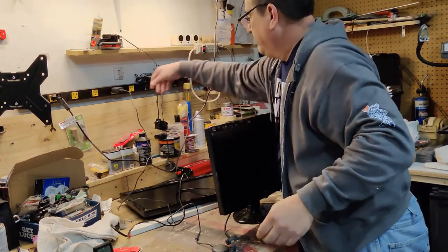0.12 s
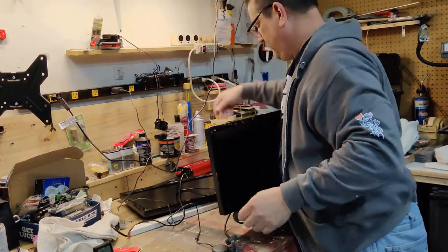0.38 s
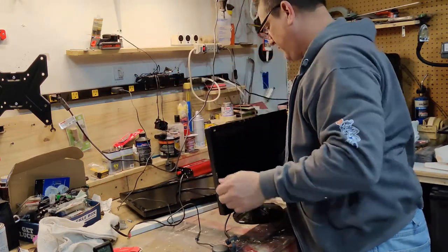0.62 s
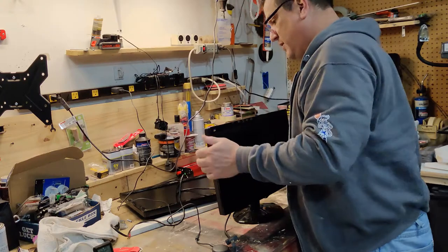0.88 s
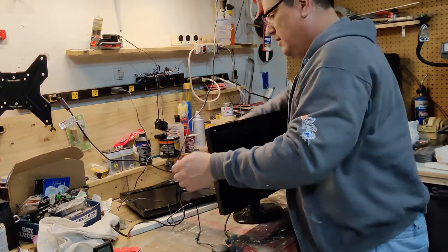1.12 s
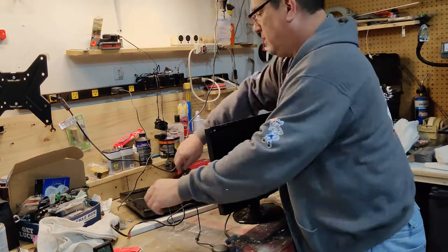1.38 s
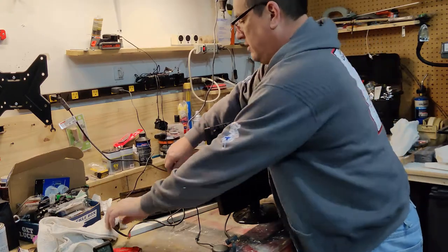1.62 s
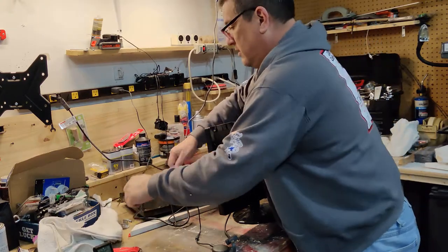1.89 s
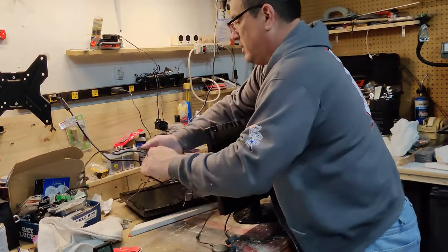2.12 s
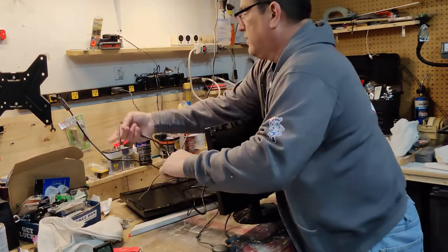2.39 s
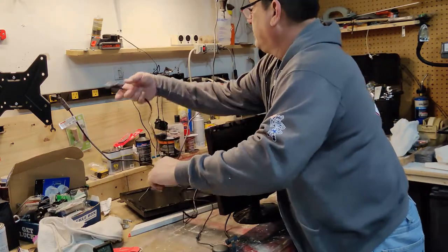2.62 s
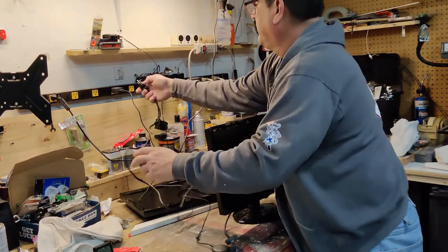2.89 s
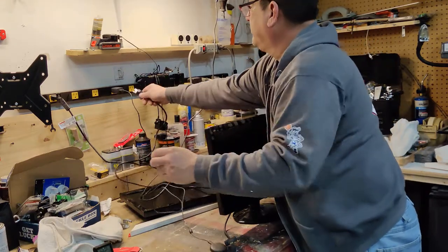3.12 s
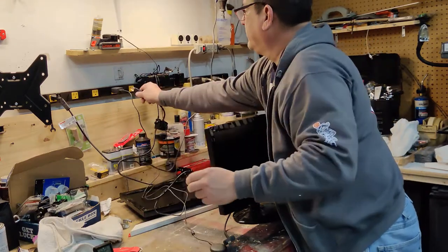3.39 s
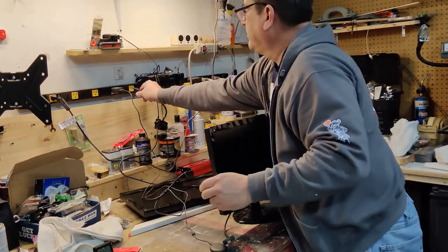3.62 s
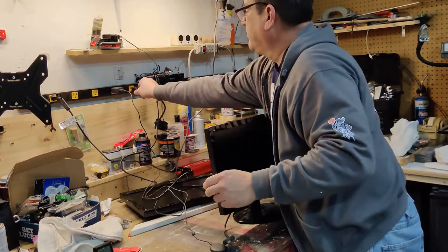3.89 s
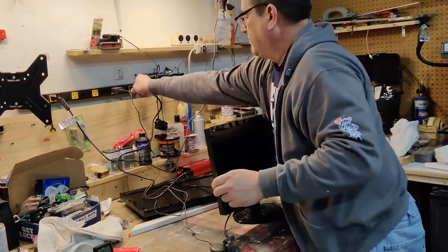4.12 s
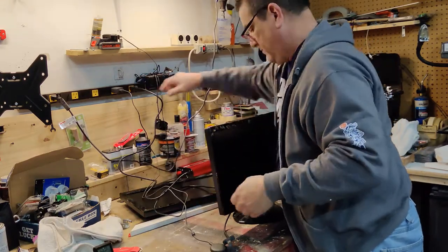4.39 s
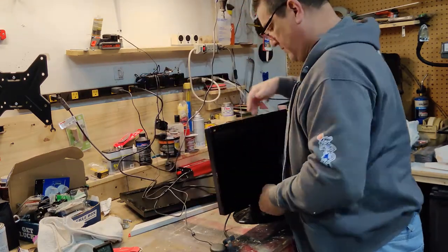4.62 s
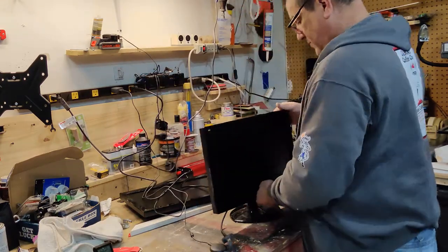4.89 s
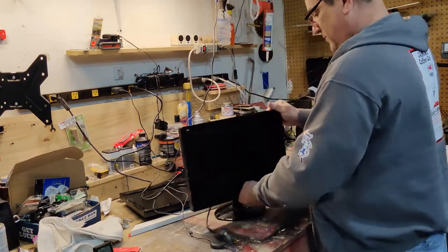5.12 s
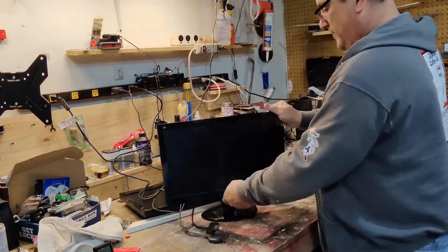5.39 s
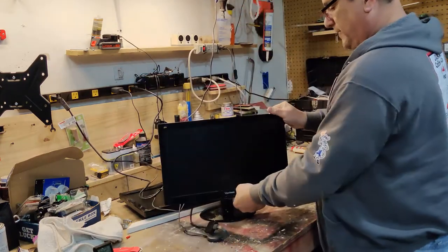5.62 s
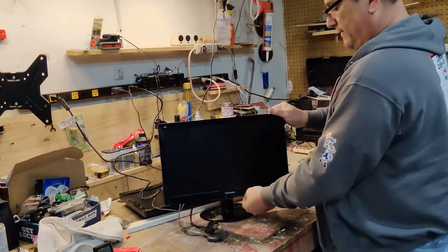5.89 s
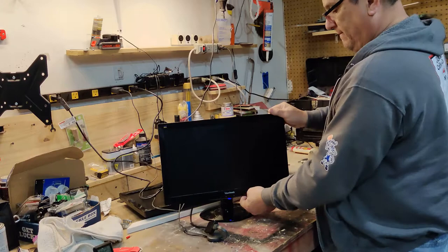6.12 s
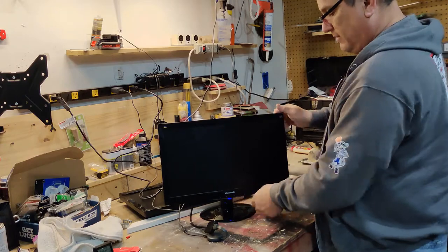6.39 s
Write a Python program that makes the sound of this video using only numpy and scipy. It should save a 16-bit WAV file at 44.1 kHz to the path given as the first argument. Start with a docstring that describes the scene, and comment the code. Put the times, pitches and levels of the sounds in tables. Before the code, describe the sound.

A low machine hum fills a garage. Faint rubbing leads to a quick clatter of plugs and cables on wood, followed by separated hard plastic knocks and light rustles as a plug is pushed in. Next come a rough slide, a low bench wobble and the loudest event, a bouncing hollow thunk of a monitor's foot. Small taps trail off. Two small microphones nearby catch dry detail and short reverberation.

```python
"""Knocks, scrapes and rustles come first: hands shift cables and push a plug into a strip on a wooden bench.
Then a monitor slides and its foot lands; behind it all a machine hums in the garage's low resonances.
Knocks are bursts of noise ringing parts and bench; rubbing is uneven noise that hisses, rustles and grinds.
The foot is a set of struck modes, the sway a low tone with rattle, the room shaped noise and wavering tones.
Two small microphones, each with its own treble peak, pick it all up."""
import sys
import numpy as np
from scipy import signal
from scipy.fft import rfft, irfft, next_fast_len
from scipy.io import wavfile
from scipy.ndimage import uniform_filter1d

SR = 44100
rng = np.random.default_rng(int(sys.argv[2]) if len(sys.argv) > 2 else 0)


def bounce(signal):
    """Save signal as a 16-bit WAV file at the path given by the first command-line argument."""
    frames = np.transpose(np.atleast_2d(signal))
    limited = np.clip(frames, -1, 1)
    pcm = np.round(limited * 32767).astype(np.int16)
    wavfile.write(sys.argv[1], SR, pcm)


def field_ratio(decibels):
    """Amplitude ratio for a level in dB (20 dB per decade); scalars and array-likes work."""
    return 10 ** (np.asarray(decibels, dtype=float) / 20)


N = 286650  # samples, 6.5 s


def evened(x):
    """Scales to rms 1."""
    return x / np.sqrt(np.mean(x ** 2) + 1e-20)


def read(points, hz):
    """Reads a table on a log-frequency axis."""
    f, value = np.transpose(points)
    return np.interp(np.log(hz + 1), np.log(f + 1), value)


def coloured(x, points):
    """Shapes the spectrum of x by (Hz, dB) points."""
    size = next_fast_len(x.shape[-1])
    gain = field_ratio(read(points, np.fft.rfftfreq(size, 1 / SR)))
    return irfft(rfft(x, size) * gain, size)[..., :x.shape[-1]]


def resonate(x, hz, width):
    """A resonance of peak gain 1."""
    return signal.lfilter(*signal.iirpeak(hz, hz / width, SR), x)


def steep_resonance(x, hz, width):
    """Two resonances in a row, the second twice as wide, brought to rms 1."""
    return evened(resonate(resonate(x, hz, width), hz, 2 * width))


def add(mix, s, sound):
    """Mixes a sound in at a time in seconds."""
    part = mix[round(s * SR):][:len(sound)]
    part += sound[:len(part)]


def envelope(start, length, rise_s, fade_db_per_s):
    """Rises, holds until start + length, then dies away."""
    t = np.arange(N) / SR - start
    return np.clip(t / rise_s, 0, 1) * field_ratio(-fade_db_per_s * np.maximum(t - length, 0))


# How alike the two sides are. Each row: frequency [Hz], left-right likeness [-1 to 1].
LIKENESS = [(60, 0.99), (180, 0.95), (550, 0.45), (1650, -0.48), (4970, 0.26), (15000, -0.69)]


def alike(left, other, hz):
    """A right-hand spectrum that shares the tabled part of the left one."""
    same = np.clip(read(LIKENESS, hz), -1, 1)
    same = same.reshape(same.shape + (1,) * (left.ndim - 1 if left.ndim == 3 else 0))
    return same * left + np.sqrt(1 - same ** 2) * other


# Broad air noise of the garage. Each row: frequency [Hz], relative density [dB per Hz].
AIR_COLOUR = [(12, -29), (20, -15.5), (133, -4), (162, -13.5), (192, -13.5), (300, -28), (326, -48),
              (355, -24.5), (510, -32), (754, -30), (891, -34), (1280, -37), (1840, -38.5), (6120, -46),
              (15800, -47)]
# Low room resonances. Each row: frequency [Hz], filter width [Hz], level [dB].
ROOM_MODES = [(37.9, 8.3, -50), (62.85, 5.9, -50), (91.1, 4.7, -47.5), (112, 8.6, -59.5), (194, 8.9, -69.5),
              (356.6, 12, -73)]
# Machine tones. Each row: frequency [Hz], middle level [dB].
HUM_TONES = [(132, -50.5), (299, -72.5)]


def room_tone():
    """Broad noise, alike left and right in the bass, with low resonances and slightly wavering tones."""
    size, t = next_fast_len(N), np.arange(N) / SR
    left, other = rfft(rng.standard_normal((2, size)))
    right = alike(left, other, np.fft.rfftfreq(size, 1 / SR))
    pair = irfft(np.array([left, right]), size)[:, :N]
    air = field_ratio(-48) * evened(coloured(pair, AIR_COLOUR))
    boom = sum(field_ratio(db) * steep_resonance(pair, hz, width) for hz, width, db in ROOM_MODES)
    waver = evened(uniform_filter1d(uniform_filter1d(rng.standard_normal(N), 6000), 6000))
    hum = sum(field_ratio(db + 0.97 * waver) * np.sqrt(2) * np.sin(2 * np.pi * hz * t + 0.44 * waver)
              for hz, db in HUM_TONES)
    return air + boom + hum


# Echo decay of the garage. Each row: frequency [Hz], time to fall by 60 dB [s].
ECHO_DECAY = [(200, 0.64), (700, 0.56), (2500, 0.44), (7000, 0.28), (14000, 0.33)]


def garage(x):
    """Sparse echoes, each band dying at its own speed, likeness set by band; three sets take turns at 7 Hz."""
    echoes = np.zeros((6, SR))
    # one echo of random sign in every 20 samples
    at = np.arange(200, SR - 20, 20) + rng.integers(0, 20, (6, (SR - 201) // 20))
    np.put_along_axis(echoes, at, rng.choice([-1., 1.], at.shape), 1)
    hz, t, z = signal.stft(echoes, SR, nperseg=512)
    z[1::2] = alike(z[::2].transpose(1, 0, 2), z[1::2].transpose(1, 0, 2), hz).transpose(1, 0, 2)
    decay = field_ratio(-60 * t / read(ECHO_DECAY, hz)[:, None])
    tails = signal.istft(z * decay, SR, nperseg=512)[1]
    tails /= np.linalg.norm(tails[0])
    turn = 2 * np.pi * 7 * np.arange(N) / SR
    out = np.zeros((2, N))
    for k in range(3):
        feed = np.sqrt(2 / 3) * np.cos(turn + 2 * np.pi * k / 3) * x
        out += signal.fftconvolve(feed[None], tails[2 * k:2 * k + 2], axes=1)[:, :N]
    return out


# Higher modes of the bench frame. Each row: frequency [Hz], filter width [Hz], level relative to the sway [dB].
FRAME_MODES = [(79, 24, -4.5), (162, 35, -17), (217, 40, -16.5), (328, 35, -12.5)]
# Leaning on the bench. Each row: start [s], length [s], sway frequency [Hz], level [dB].
LEANS = [(4.09, 0.087, 62.4, -34.5), (4.912, 0.14, 47.4, -25.5), (5.209, 0.35, 54.3, -46.5),
         (5.717, 0.082, 64.1, -40.5)]


def sway():
    """Each push rocks the frame on its lowest mode and rattles the higher ones."""
    push, t = rng.standard_normal(N), np.arange(N) / SR
    rattle = sum(field_ratio(db) * steep_resonance(push, hz, width) for hz, width, db in FRAME_MODES)
    out = np.zeros(N)
    for s, length, hz, db in LEANS:
        rocking = np.sqrt(2) * np.sin(2 * np.pi * hz * (t - s))
        level = field_ratio(db) * envelope(s, length, rise_s=0.027, fade_db_per_s=103)
        out += level * (rocking + rattle)
    return out


# Modes of the wooden top. Each row: frequency [Hz], relative level [dB], time to fall by 60 dB [s].
BENCH_MODES = [(217, -9.5, 0.075), (275, -17.5, 0.11), (318, -13.5, 0.023), (372.5, -3, 0.032),
               (439.4, -7, 0.075), (529.5, 6, 0.023), (603.3, 0, 0.041), (699, 13.5, 0.014),
               (855, 0, 0.026), (1042, -3.5, 0.032), (1253, -17.5, 0.1)]


def bench(force):
    """The wooden top answers any force with its modes."""
    t = np.arange(SR // 4) / SR
    ring = sum(field_ratio(db - 60 * t / t60) * np.sin(2 * np.pi * hz * t) for hz, db, t60 in BENCH_MODES)
    return signal.oaconvolve(force, ring / np.linalg.norm(ring))[:N]


def streaky(x):
    """Brief narrow patches of the spectrum stand out and fade as surfaces catch."""
    z = signal.stft(x, nperseg=512, noverlap=384)[2]
    patches = uniform_filter1d(rng.standard_normal(z.shape), size=2, axis=0)
    patches = uniform_filter1d(patches, size=14, axis=1)
    streak_db = 3.5 * evened(patches)
    return evened(signal.istft(z * field_ratio(streak_db), nperseg=512, noverlap=384)[1][:N])


# Strokes of cables, sleeves and the monitor's foot.
# Each row: start [s], length [s], grind force on the bench [dB], rustle [dB], hiss [dB].
RUB_STROKES = [(0, 0.02, -55.5, -56.5, -61.5), (1.007, 0.19, -65, -73.5, -75),
               (1.581, 0.21, -59.5, -64.5, -66.5), (1.842, 0.12, -41, -52.5, -78),
               (1.96, .16, -51, -68, -55), (2.28, 0.11, -63, -63, -74), (2.38, 0.14, -77, -58, -64),
               (2.58, 0.16, -67, -60, -63.5), (2.81, 0.041, -63, -59.5, -81), (2.94, 0.3, -58, -60, -68),
               (3.64, 0.16, -59.5, -68, -81), (3.982, .12, -60.5, -71, -71), (4.25, 0.035, -69, -59, -76),
               (4.654, 0.18, -70, -69.5, -68), (4.892, 0.18, -39, -44, -44.5),
               (5.068, 0.24, -46, -40, -43.5), (5.25, 0.19, -35, -42.5, -49.5),
               (5.862, 0.074, -72, -70, -70), (6.327, 0.15, -68.5, -78, -76.5)]
# Sliding just after a knock, four layers: grind, rustle, hiss, top of the hiss.
# Columns: start relative to the thud, blow, tick and adjusted tick in turn [dB].
SETTLE_START = (-10.5, -14, -11.5, -29.5)
# Columns: fade of the same four layers [dB per s].
SETTLE_FADE = (82, 110, 151, 170)


def contact():
    """Levels of grind, rustle, hiss and its top: strokes and the settling after each knock add up in power."""
    power = np.zeros((4, N))
    for start, length, *db in RUB_STROKES:
        level = field_ratio([*db, db[2] - 8])[:, None]  # top of the hiss: 8 dB under it
        power += (level * envelope(start, length, rise_s=0.046, fade_db_per_s=108)) ** 2
    t, fade = np.arange(SR // 2) / SR, np.array(SETTLE_FADE)[:, None]
    for s, db, _, thud_db, tick_db in PART_KNOCKS:
        top_db = tick_db - 0.53 * thud_db  # stronger the less of the blow goes into the bench
        start_db = db + np.array([thud_db, 0, tick_db, top_db]) + SETTLE_START
        for layer, settling in zip(power, field_ratio(start_db[:, None] - fade * t)):
            add(layer, s, settling ** 2)
    return np.sqrt(power)


# Colour of the fine slips. Each row: frequency [Hz], relative density [dB per Hz].
HISS_COLOUR = [(1760, -30), (3000, -7), (4530, -6.5), (6260, -5.5), (7130, -6.5), (15500, -26.5)]
# Colour of the finest slips. Each row: frequency [Hz], relative density [dB per Hz].
TOP_COLOUR = [(7000, -28), (10000, -1), (13000, -2), (15800, 0)]


def rubbing():
    """Dense uneven slips: the finest hiss, middling ones rustle, coarse ones grind through the bench."""
    grind, rustle, hiss, top = contact()
    uneven_db = 3.0 * evened(uniform_filter1d(rng.standard_normal((4, N)), 300))
    coarse, middling, fine, finest = rng.standard_normal((4, N)) * field_ratio(uneven_db)
    middling = streaky(resonate(resonate(middling, 1350, 2260), 1520, 2850))
    out = bench(grind * evened(coarse)) + rustle * middling
    out += hiss * evened(coloured(fine, HISS_COLOUR))
    return out + top * evened(coloured(finest, TOP_COLOUR))


# Knocks of plugs, cables and the monitor's foot. Each row: start [s], blow [dB], ring of the struck part [Hz],
# thud force relative to the blow, before the bench gain [dB], treble tick relative to the blow [dB].
PART_KNOCKS = [(0.019, -48, 2500, 0.5, -10), (1.037, -61, 900, 1.5, -6), (1.17, -62, 990, 4.5, 1.5),
               (1.57, -57, 4270, -21, 3.5), (1.666, -51.5, 1640, -4, -29), (1.834, -47, 1510, -1, 3),
               (1.861, -50, 2980, -4, -2), (1.89, -44, 890, 5.5, -23), (1.936, -24, 1410, -10, -16.5),
               (1.99, -33, 1300, -5.5, -6.5), (2.008, -34, 1130, -16, -11), (2.101, -29, 1070, -12, -0.5),
               (3.003, -60, 1500, -3, -5), (3.054, -21.5, 1550, -20, -6.5), (3.25, -30, 1650, -4, -22),
               (3.31, -49.5, 905, 9.5, -30), (3.725, -45, 1720, -1, -19), (3.77, -47, 2030, -4, -13),
               (3.85, -52, 1870, -1.5, -5), (4.038, -62, 1900, -6, 5), (4.059, -60, 3740, 5.5, 5),
               (4.107, -26, 1700, -3.5, -8.5), (4.283, -50, 2540, -12, -9), (4.317, -49.5, 1880, -12, -2),
               (4.921, -40, 900, 8, -30), (5.298, -22, 2240, -5, -20), (5.737, -53, 1030, 13.5, -23),
               (6.082, -51.5, 1060, -16, 5)]
# Light taps that ring one small part on a clearer note.
# Each row: start [s], blow [dB], note [Hz], filter width [Hz].
LIGHT_TAPS = [(.955, -56, 4200, 800), (1.752, -41.5, 3040, 1300), (2.17, -43, 1750, 400),
              (3.154, -26.5, 1810, 700), (3.67, -50, 1850, 790), (4.074, -41, 735, 219),
              (4.706, -60, 4660, 1500), (6.316, -47, 920, 404)]
# Colour of the treble tick. Each row: frequency [Hz], relative density [dB per Hz].
TICK_COLOUR = [(2060, -62), (3500, -13.5), (6250, -3.5), (6990, -10), (7570, -3.5), (10000, -13.5),
               (15500, -19)]


def knocks():
    """Each contact is a short rattle of force that rings the part, ticks in the treble and thuds into the bench."""
    out, thuds, t = np.zeros(N), np.zeros(N), np.arange(SR // 8) / SR
    # a sharp blow, then small bounces; taps do not bounce
    blow = (1 - np.exp(-t / 0.00013)) * (np.exp(-t / 0.0044) + 0.26 * np.exp(-t / 0.016))
    tap = (1 - np.exp(-t / 0.00065)) * np.exp(-t / 0.0047)
    rows = [(*row, row[2], blow) for row in PART_KNOCKS]  # filter as wide as its pitch
    rows += [(s, db, hz, -9, -20, width, tap) for s, db, hz, width in LIGHT_TAPS]
    white = rng.standard_normal((len(rows), len(t)))
    ticks = evened(coloured(white, TICK_COLOUR))
    for (s, db, hz, thud_db, tick_db, width, shape), noise, tick in zip(rows, white, ticks):
        part = steep_resonance(resonate(noise, hz, width), hz, width)
        add(out, s, shape * (field_ratio(db) * part + field_ratio(db + tick_db) * tick))
        add(thuds, s, field_ratio(db + thud_db) * shape * noise)
    return out + field_ratio(5.5) * bench(thuds)


# The monitor's foot comes down and bounces. Each row: start [s], blow [dB].
FOOT_BOUNCES = [(5.287, -22.5), (5.293, -18.5), (5.299, -11), (5.333, -19), (5.358, -21), (5.371, -17.5),
                (5.403, -22), (5.433, -28.5)]
# Modes of the hollow foot. Each row: frequency [Hz], middle relative level [dB], time to fall by 60 dB [s].
FOOT_MODES = [(532, 1, 0.051), (580, 0, 0.047), (625, 3.5, 0.058), (717, -0.5, 0.047), (870, -1, 0.056),
              (1022, -2.5, 0.062), (1080, -8, .06), (1249, -2, 0.08), (1740, -13, 0.046), (2420, -7, .02),
              (3030, -6.5, 0.03)]


def landing():
    """Each bounce is a brief contact that rings the hollow foot, every mode struck a little differently."""
    out, t = np.zeros(N), np.arange(SR // 6) / SR
    hz, mode_db, t60 = np.transpose(FOOT_MODES)[..., None]
    chance = rng.standard_normal((len(FOOT_BOUNCES), 2, len(FOOT_MODES), 1))
    for (s, db), (size, shift) in zip(FOOT_BOUNCES, chance):
        level = field_ratio(mode_db + 4.4 * size - 60 * t / t60)
        ring = (level * np.sin(2 * np.pi * hz * (1 + 0.008 * shift) * t + 1.47 * shift)).sum(0)
        onset = 1 - np.exp(-t / 0.00025)
        add(out, s, field_ratio(db) * onset * ring / np.abs(ring).max())
    return out


def scene():
    """Everything handled, its echo, and the room tone."""
    hits, rubs = knocks() + landing(), rubbing()
    echo = garage(field_ratio(-2.0) * hits + field_ratio(-3.0) * rubs)
    return hits + rubs + sway() + echo + room_tone()


def top_cut(x):
    """Nothing passes above the cut-off."""
    return signal.sosfilt(signal.butter(12, 16510, fs=SR, output="sos"), x)


# Colour of the left microphone. Each row: frequency [Hz], gain before the overall level [dB].
LEFT_COLOUR = [(300, -0.5), (3000, -3.5), (4800, -5), (6200, -9), (7600, 1), (9500, -2), (12000, -2)]
# Colour of the right microphone. Each row: frequency [Hz], gain before the overall level [dB].
RIGHT_COLOUR = [(300, 0), (3000, -3), (4800, -1.5), (6200, 6.5), (7000, -8.5), (9500, -7.5), (12000, -2.5)]


def record(dry):
    """Each microphone port colours the treble its own way, the right one a sample late; then a band limit."""
    left = field_ratio(-2.0) * coloured(dry[0], LEFT_COLOUR)
    right = field_ratio(-1.53) * coloured(dry[1], RIGHT_COLOUR)
    ports = np.array([left, np.roll(right, 1)])
    low_pass = signal.firwin(255, 15900, window=("kaiser", 7), fs=SR)  # edge in Hz
    mix = signal.oaconvolve(ports, low_pass[None], "same")
    return top_cut(mix)


dry = scene()
out = record(dry)
bounce(out)
```